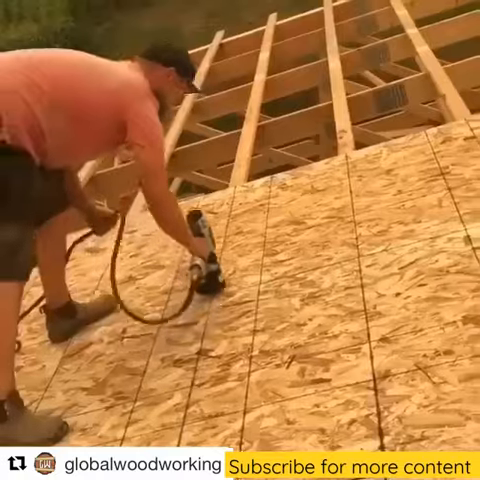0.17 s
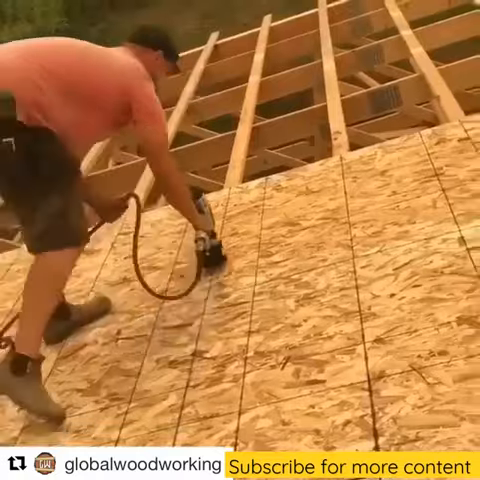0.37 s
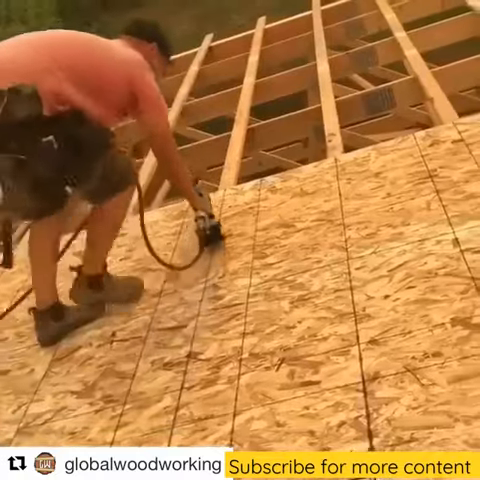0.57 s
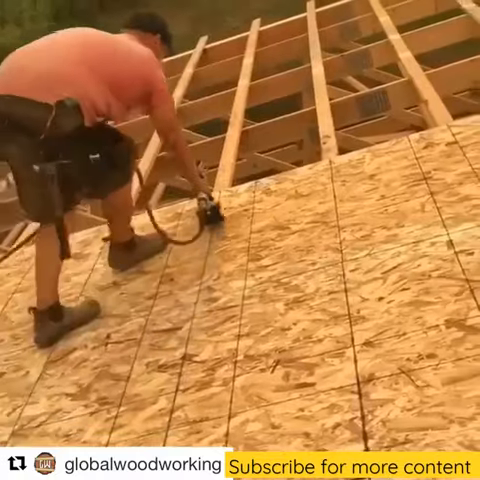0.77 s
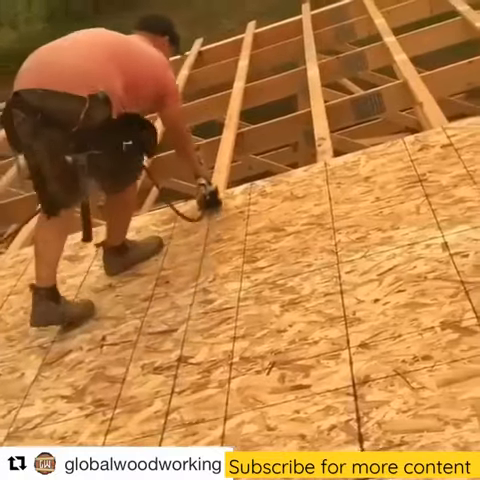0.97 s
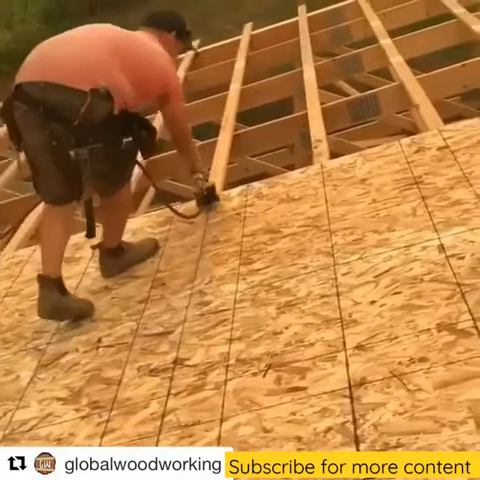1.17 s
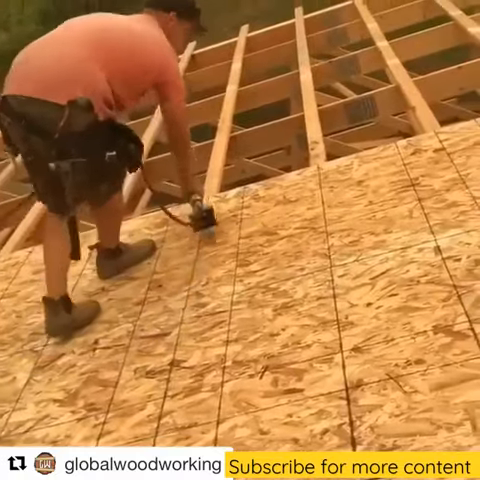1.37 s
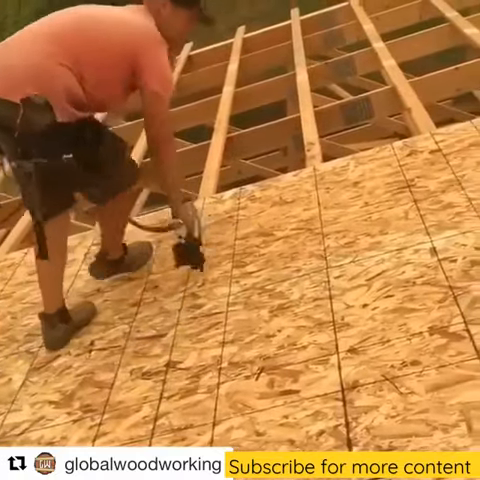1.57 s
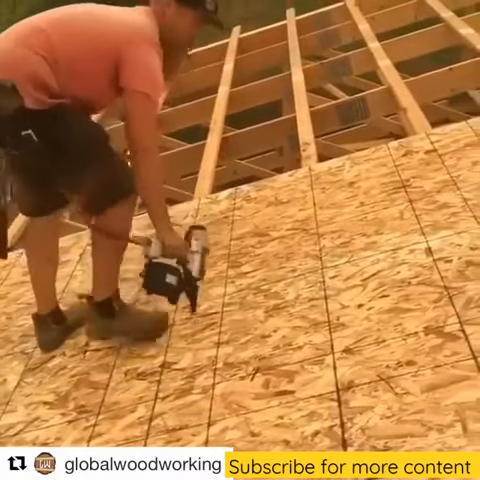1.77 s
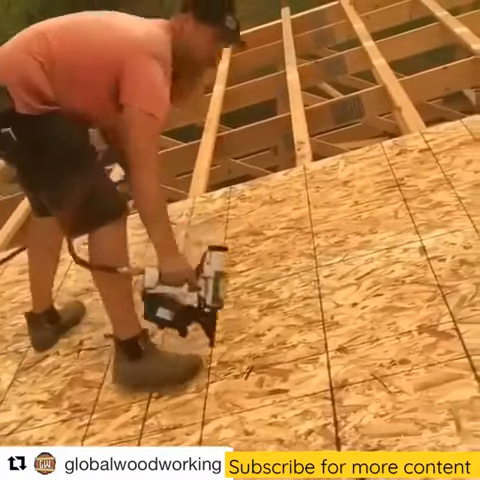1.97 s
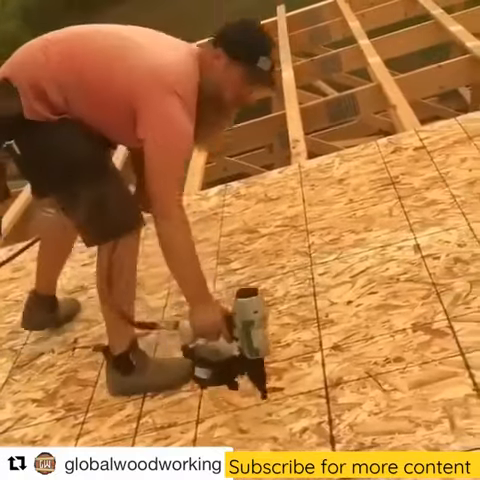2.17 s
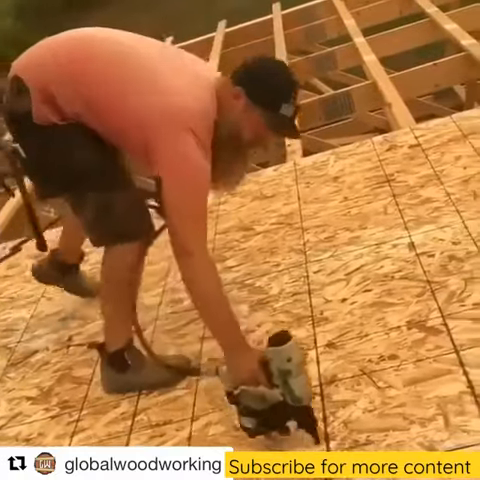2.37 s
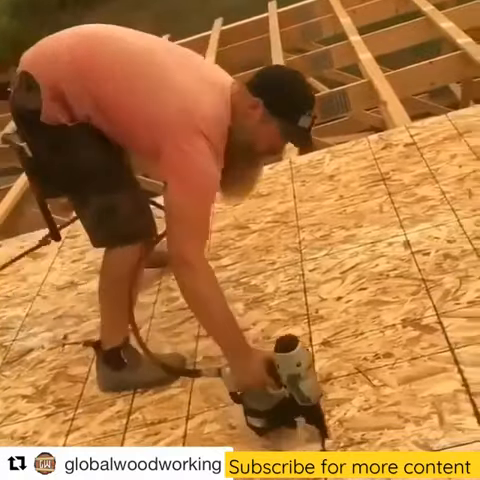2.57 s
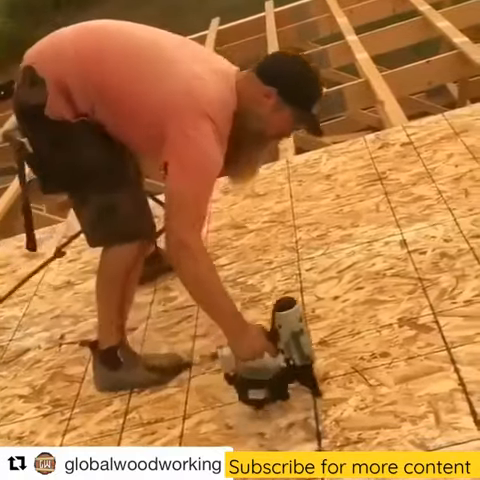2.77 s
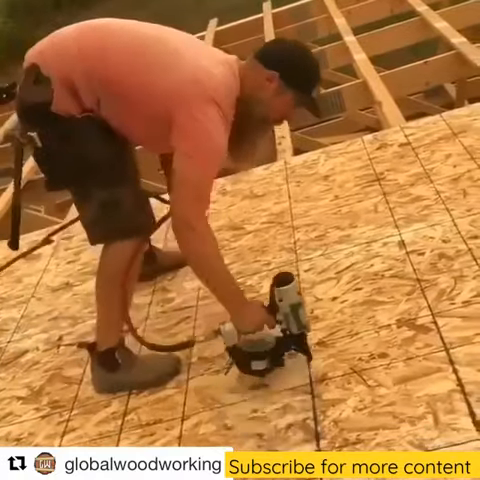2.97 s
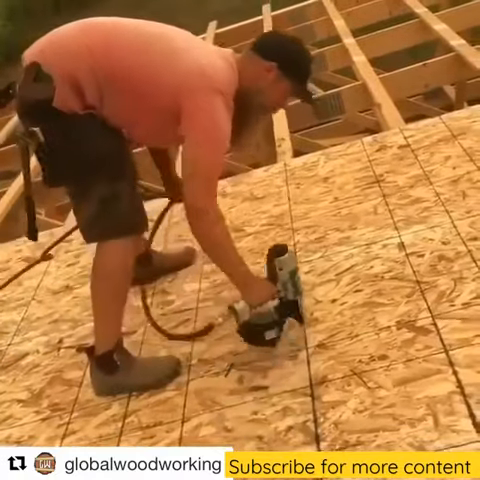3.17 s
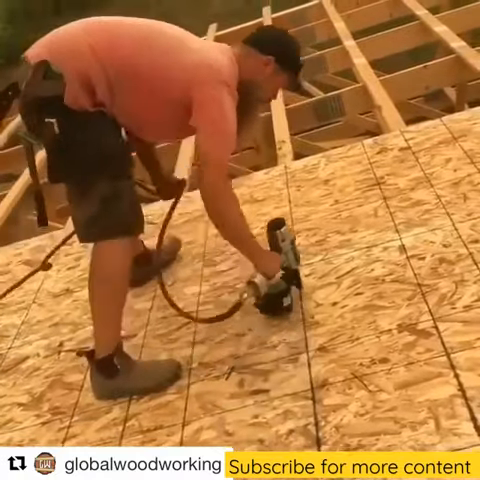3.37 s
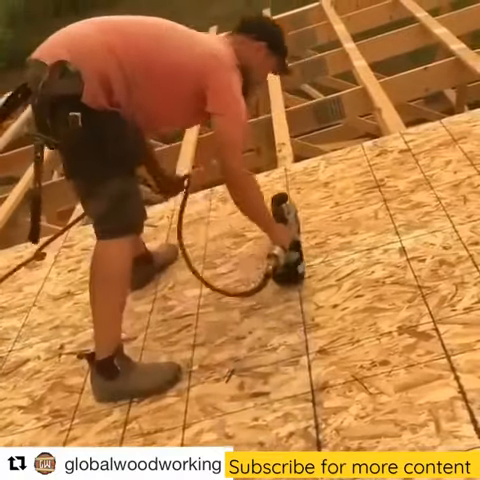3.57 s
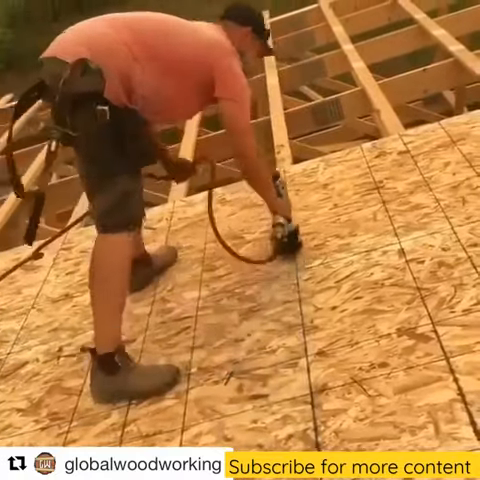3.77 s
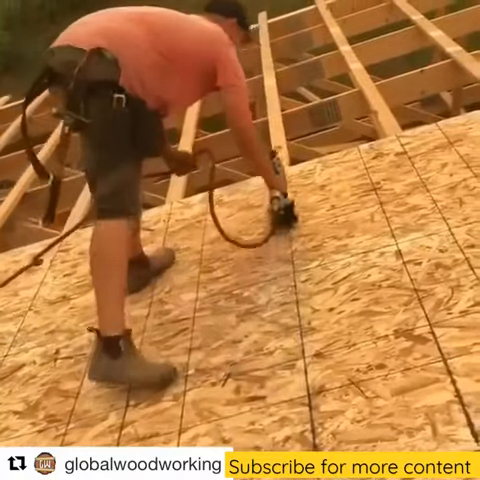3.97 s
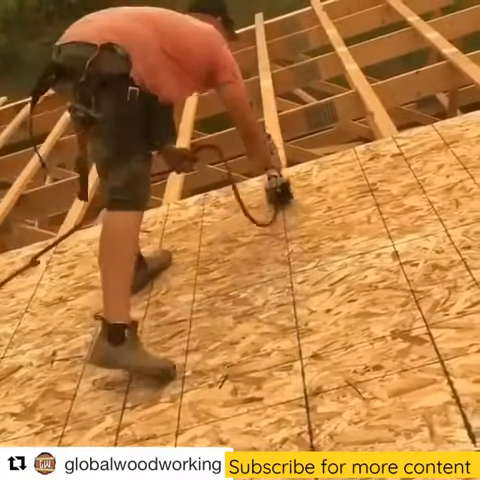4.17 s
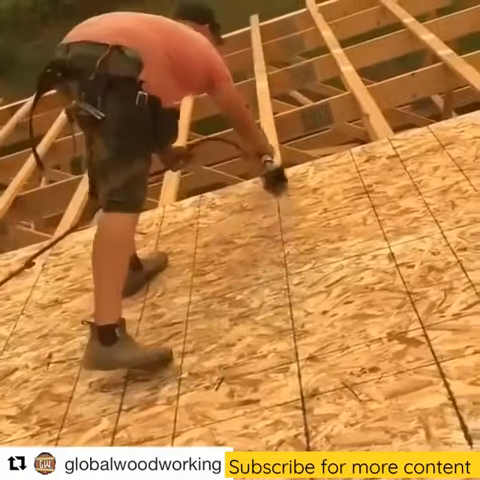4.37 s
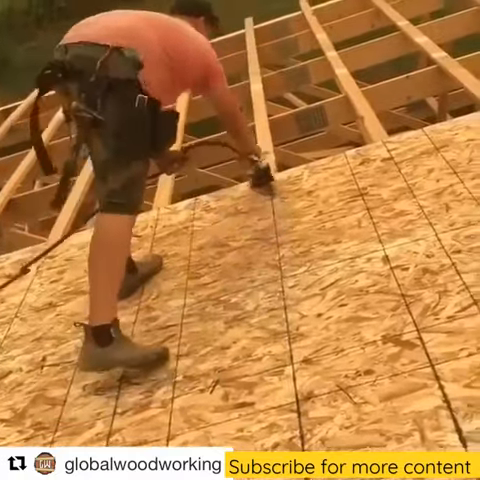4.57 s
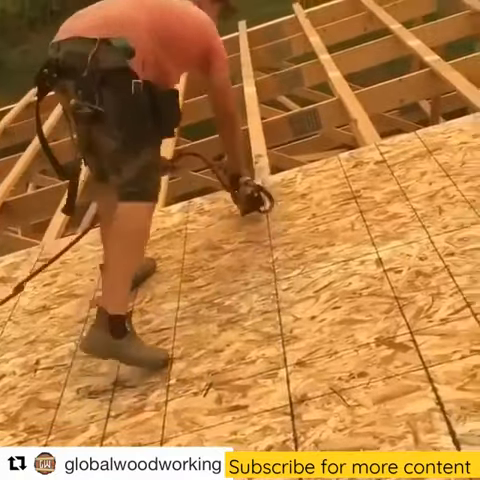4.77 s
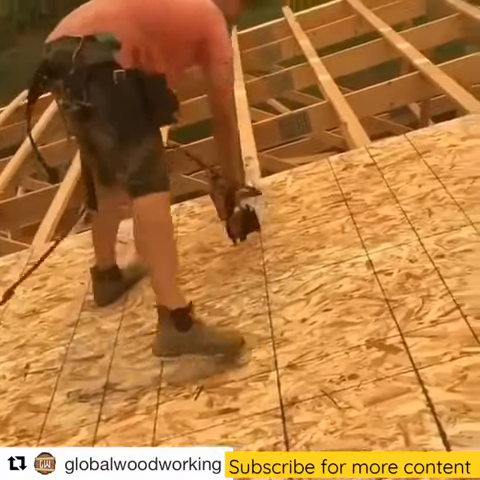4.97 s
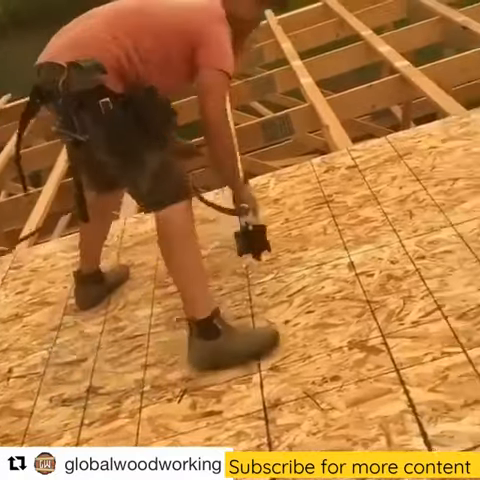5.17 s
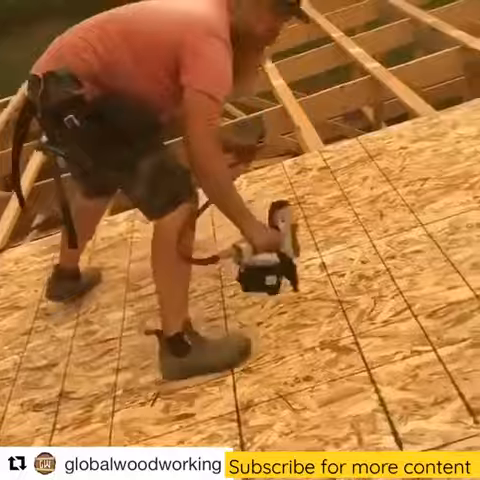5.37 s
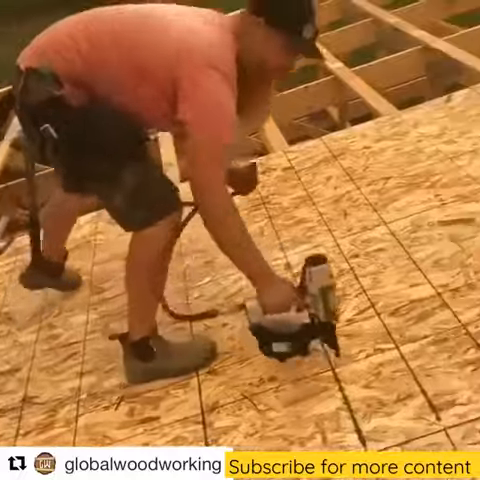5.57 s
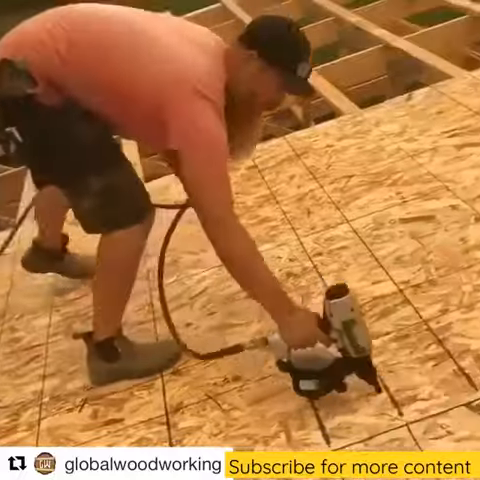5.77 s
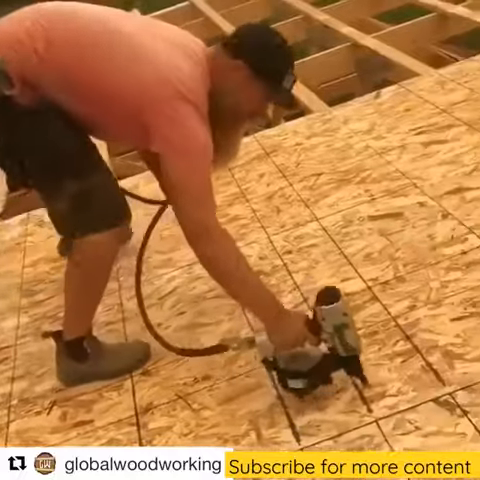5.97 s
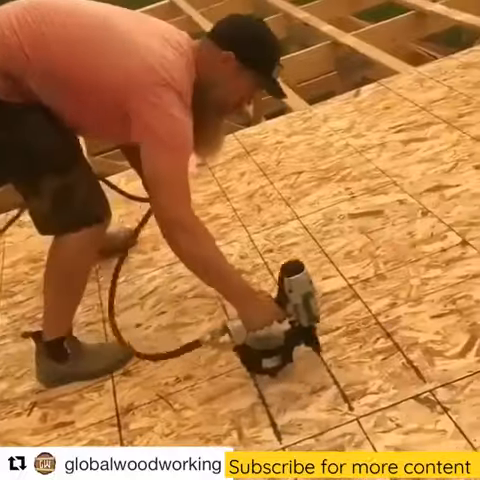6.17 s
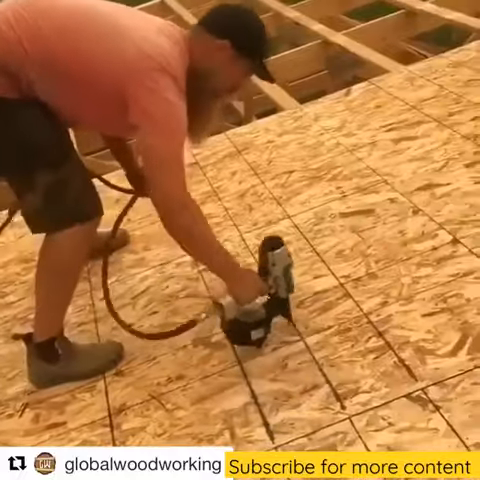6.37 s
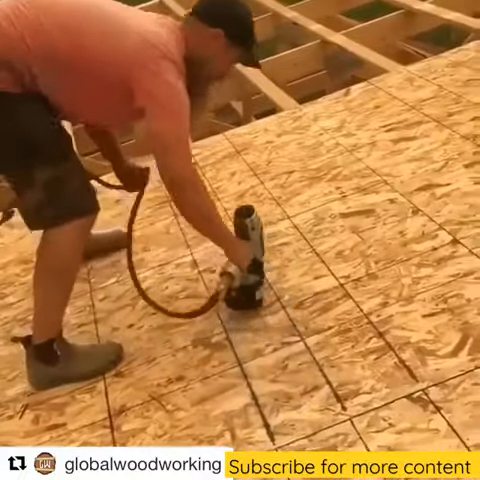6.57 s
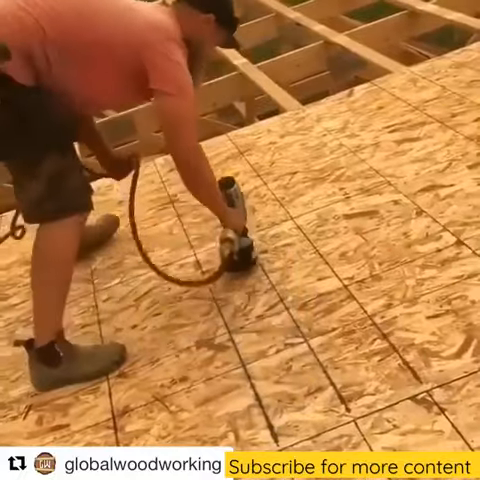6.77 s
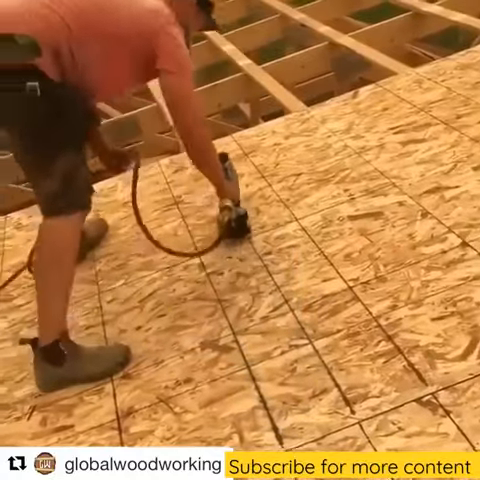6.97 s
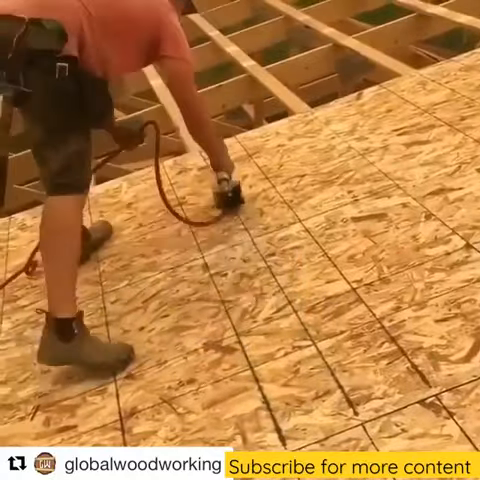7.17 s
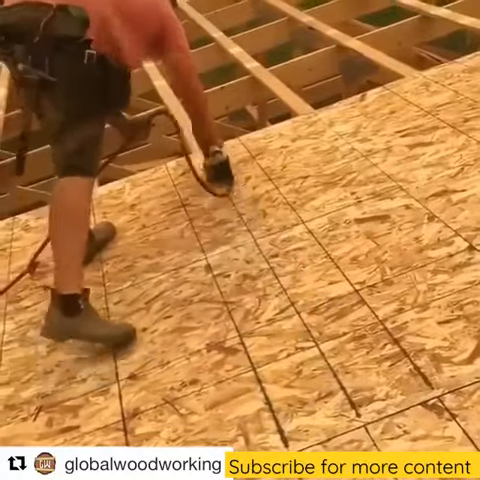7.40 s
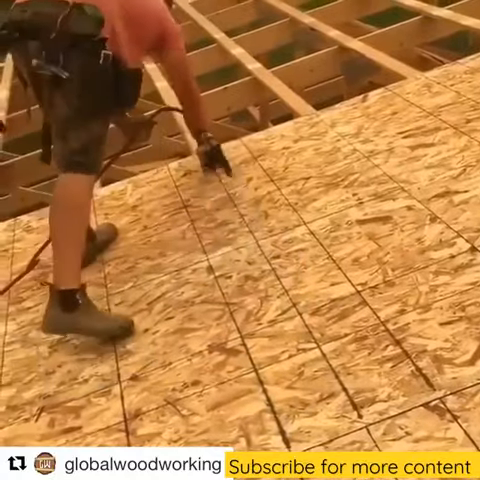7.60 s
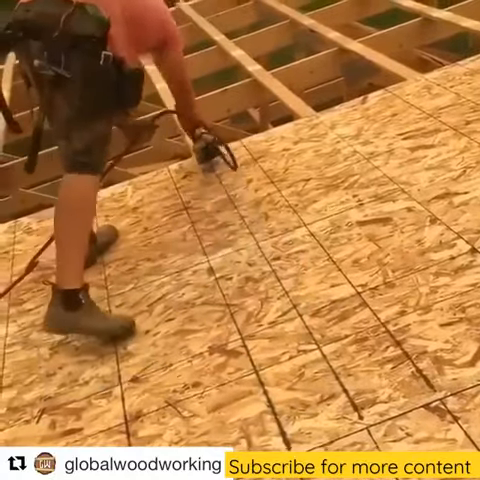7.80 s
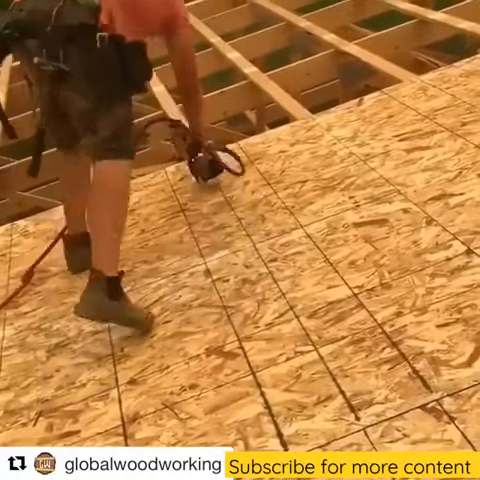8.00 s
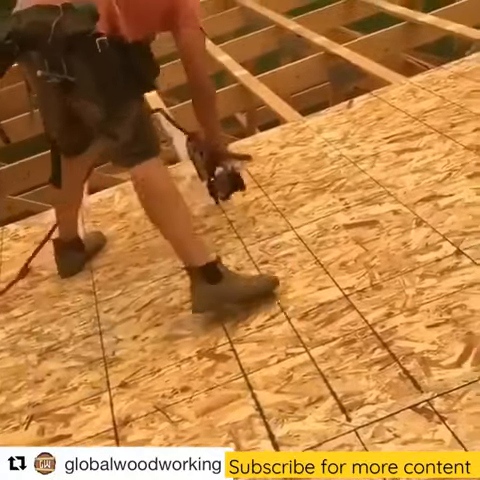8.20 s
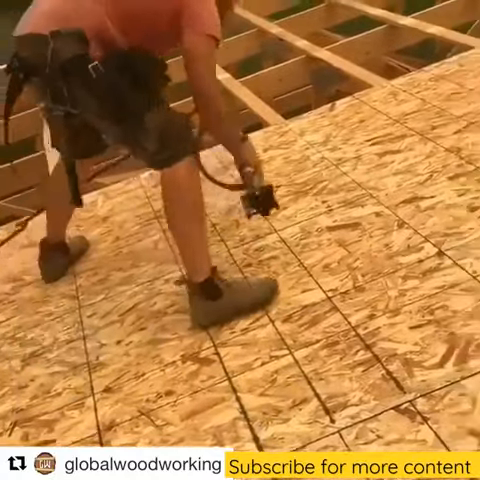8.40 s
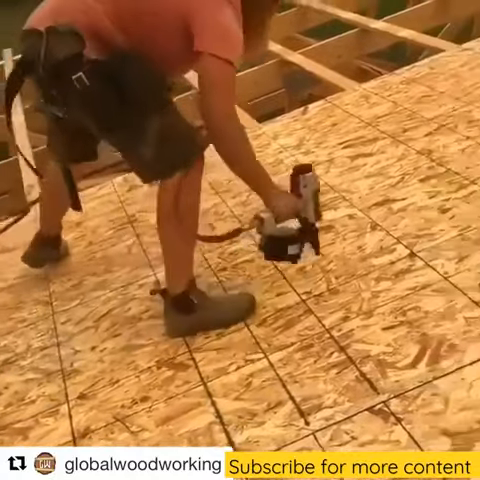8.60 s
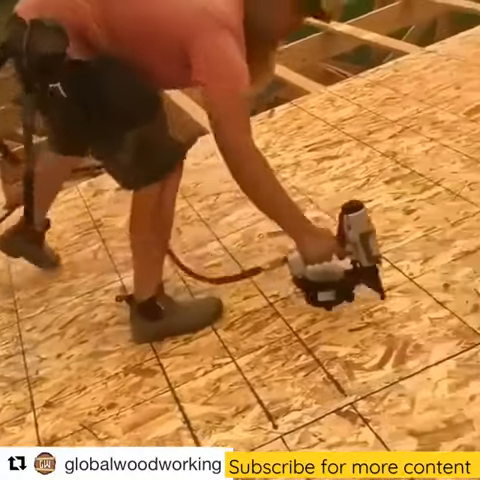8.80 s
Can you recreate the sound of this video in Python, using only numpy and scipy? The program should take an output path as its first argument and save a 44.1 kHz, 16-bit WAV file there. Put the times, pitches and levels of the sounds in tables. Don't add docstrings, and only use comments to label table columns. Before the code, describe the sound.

A pneumatic coil nailer is bumped along wooden roof sheathing outdoors, about ten nails a second. Three runs of sharp woody blows with steely cracks, low deck thumps and short air puffs are separated by quieter pauses, when boots scrape and step, the hose knocks and belt hardware ticks. The air puffs soften as the tool moves away. One nearby microphone catches light low wind and a short scatter off the rafters.

```python
import sys
import numpy as np
from scipy import signal
from scipy.fft import rfft, irfft
from scipy.io import wavfile
from scipy.ndimage import uniform_filter1d, minimum_filter1d

SR = 44100
rng = np.random.default_rng(int(sys.argv[2]) if len(sys.argv) > 2 else 0)


def volts(x):
    e = np.asarray(x, float) / 20
    return 10 ** e


def log_audio(samples):
    frames = np.atleast_2d(samples).T
    limited = np.clip(frames, -1, 1)
    pcm = np.round(limited * 32767).astype(np.int16)
    wavfile.write(sys.argv[1], SR, pcm)


N = 389844

# pitch_hz, width_hz, level_db
BOARD_MODES = [(562, 99, -1), (602, 54.4, -2), (680, 155, 7), (900, 377, 9), (1130, 202, 8.5),
               (1488, 152, 4), (1705, 302, 9.5), (2373, 280, -1)]
# pitch_hz, width_hz, level_db
STEEL_MODES = [(3366, 460, 11.5), (3890, 275, -1), (4450, 260, 5), (5350, 550, 5), (9800, 4000, -44)]
# frequency_hz, density_db per Hz
JET_SPECTRUM = [(880, -15), (1500, -1), (1800, -14), (2000, -11.5), (2690, -11), (3550, -3), (3980, -2.5),
                (4550, -5), (5670, -13.5), (7210, -19.5), (9330, -16.5), (12900, -20), (14400, -29),
                (14800, -110)]
FAR_DB = -44


def evened(x):
    return x / np.sqrt(np.mean(x ** 2) + 1e-20)


def peaked(x, db):
    return volts(db) * x / np.sqrt(uniform_filter1d(x ** 2, size=220).max())


def read(points, hz):
    f, value = np.transpose(points)
    return np.interp(np.log(hz + 1), np.log(f + 1), value)


def add(mix, s, sound):
    part = mix[max(round(s * SR), 0):][:len(sound)]
    part += sound[:len(part)]


def coloured(spectrum, count=N):
    z = rfft(rng.standard_normal(count))
    return evened(irfft(z * volts(read(spectrum, np.fft.rfftfreq(count, 1 / SR))), count))


def patchy(x, db):
    z = signal.stft(x, SR, nperseg=512)[2].T
    patches = uniform_filter1d(rng.standard_normal(z.shape), size=5, axis=0)
    patches = evened(uniform_filter1d(patches, size=5, axis=1))
    return signal.istft((z * volts(db * patches)).T, SR, nperseg=512)[1][:len(x)]


def wander(hz):
    band = signal.butter(1, [hz / 4, hz], "band", fs=SR, output="sos")
    return evened(signal.sosfilt(band, rng.standard_normal(N)))


def swell(t, start, rise, fall):
    u = np.maximum(t - start, 0)
    return (1 - np.exp(-u / rise)) * np.exp(-u / fall)


def ring(modes, detune, t, rise):
    hz, width, db = np.transpose(modes)[:, :, None]
    half_turns = np.arange(len(hz))[:, None] / 2
    turns = hz * detune[:len(hz), None] * t + half_turns
    waves = volts(db) * np.exp(-np.pi * width * t) * np.sin(2 * np.pi * turns)
    return waves.sum(0) * (1 - np.exp(-t / rise))


def nailer():
    out = np.zeros(N)
    for s, *levels in shots():
        knock, jet, lead = shot(*levels)
        add(out, s - lead, knock + jet)
        add(out, s - lead, volts(-15.5) * signal.fftconvolve(knock + 0.17 * jet, framing()))
    return out


def shots():
    # pop_s, blow_db, strongest board ring_hz, deck thump_db, steel crack_db
    run_1 = [(0.0222, -13.5, 1130, -15, -13.5), (0.1164, -14, 1014, -15, -10.5),
             (0.2108, -13.5, 1560, -14.5, -14), (0.3066, -10.5, 650, -21, -13.5),
             (0.4103, -17, 750, -33, -35), (0.5124, -17, 1260, -23.5, -14),
             (0.6211, -13.5, 1350, -18.5, -7), (0.7248, -12, 763, -14.5, -8),
             (0.8351, -14, 900, -17.5, -12.5), (0.9307, -17, 1010, -15, -15.5),
             (1.0302, -15, 1040, -19.5, -15), (1.118, -15.5, 1325, -15.5, -9),
             (1.2125, -14.5, 980, -17, -15), (1.3045, -13, 765, -25, -15), (1.403, -13.5, 775, -22, -11.5)]
    run_2 = [(2.8102, -12, 1443, -14.5, -21), (3.0151, -11.5, 1400, -11.5, -43),
             (3.084, -10.5, 980, -5, -33), (3.3641, -8.5, 1350, -11.5, -6), (3.4739, -12, 1320, -12, -10.5),
             (3.5536, -14, 735, -10.5, -24), (3.6395, -13, 1380, -12.5, -22),
             (3.7242, -18, 1470, -16.5, -23), (3.8108, -14, 990, -25, -29), (3.9066, -15, 1310, -45, -22),
             (4.0108, -17, 1290, -21.5, -11), (4.1018, -12, 630, -21.5, -10.5),
             (4.197, -10.5, 645, -16.5, -13), (4.3004, -13, 534, -15, -3.5), (4.4024, -13, 606, -14, -8.5),
             (4.5002, -12.5, 1613, -16, -8), (4.613, -12, 1280, -14.5, -7.5),
             (4.7415, -12.5, 1256, -20, -11.5), (4.8477, -13.5, 1350, -28, -7.5)]
    run_3 = [(6.2449, -10, 1455, -15.5, -11), (6.44, -11, 770, -12.5, -4), (6.5441, -11.5, 1380, -14, -22),
             (6.632, -13, 1000, -11, -6), (6.7357, -10, 1025, -12.5, -2.5), (6.8347, -13, 680, -11.5, -14),
             (6.932, -13, 680, -13, -22), (7.0263, -12.5, 696, -17, -17), (7.1162, -11.5, 680, -20, -14),
             (7.2152, -13.5, 660, -19, -15.5), (7.322, -16.5, 1510, -19.5, -12.5),
             (7.415, -11, 1320, -15.5, -6), (7.5136, -15.5, 1300, -14, -9), (7.6153, -13, 617, -12, -5),
             (7.7177, -17, 1380, -13, -10), (7.8173, -14, 1510, -15.5, -15), (7.924, -10.5, 670, -17, -10),
             (8.0203, -15.5, 645, -21, -9.5), (8.107, -16.5, 940, -25.5, -14.5)]
    # first_shot_db, far_end_db, turn_s
    facing = [(-37, -43, 0.31), (-28, -43, 0.91), (-28.5, -43.5, 0.7)]
    turn_shape = 1.84
    rows = []
    for run, (first_db, last_db, turn_s) in zip((run_1, run_2, run_3), facing):
        since = np.array(run)[:, 0] - run[0][0]
        turned = np.exp(-(since / turn_s) ** turn_shape)
        rows += [*np.c_[run, last_db + (first_db - last_db) * turned]]
    return np.array(rows)


def shot(blow_db, ring_hz, thump_db, crack_db, exhaust_db):
    # pitch_hz, width_hz, level_db
    deck = [(67, 19, -30.5), (102, 20.8, 12), (120.5, 34.6, 15), (155.2, 22.2, 13.5), (198.7, 3.7, -12),
            (239.7, 22.8, 9.5), (314, 79, 15.5)]
    t = np.arange(9000) / SR
    lead = .016
    blow = lead + .0048
    detune = rng.uniform(0.9277, 1.025, 12)
    chance, sign = rng.random(len(t)), rng.standard_normal(len(t))

    jerks = (chance < 1600 / SR) * sign * swell(t, blow, 0.00022, 0.0076)
    jerks[round((blow + .001) * SR)] += 1.2
    rattle = (chance > 1 - 1500 / SR) * sign * swell(t, blow + 0.0046, 0.0086, 0.046)
    spot = np.add(BOARD_MODES, np.outer(sign[-len(BOARD_MODES):], [0, 0, 2.5]))
    board = ring([*spot, (ring_hz, 110, 3.)], detune, t[:3000], 0.0011)
    knock = peaked(signal.fftconvolve(jerks + 0.15 * rattle, board)[:len(t)], blow_db + 1.57)

    push = t < .001 / 20
    stroke = push + 4.0 * (chance < 2500 / SR) * sign * (t < .005)
    housing = ring([(1350, 420, 14.2), (720, 170, 1), (3360, 670, 2.6)], detune, t[:500], 0.0003)
    pop = signal.fftconvolve(stroke, housing)[:800]
    add(knock, lead, peaked(pop, -20.5 + .85 * (exhaust_db + 42)))

    tip = push + .5 * (chance < 1500 / SR) * sign * np.exp(-t / 0.0057)
    crack = signal.fftconvolve(tip, ring(STEEL_MODES, detune, t[:600], 0.00024))[:1500]
    add(knock, blow + 0.001295, peaked(crack, crack_db - 8.0))
    thump = ring(deck, 1 + 2.94 * (detune[::-1] - 1), t, 0.0048)
    add(knock, blow, peaked(thump, thump_db - .7))

    shut = np.clip((blow + 0.0069 - t) / 0.0034, 0, 1)
    valve = volts(4.5 - 0.52 * (exhaust_db + 56.0)) * swell(t, 0, 0.018, 0.2) * shut
    puff = 1.044 * swell(t, lead + 0.00035, 0.0095, 0.027)
    flutter = volts(2.4 * evened(uniform_filter1d(sign, size=90)))
    jet = patchy(coloured(JET_SPECTRUM, count=len(t)), 1.15) * flutter
    muffled = signal.lfilter(*signal.butter(2, 6500, fs=SR), jet)
    air = volts(exhaust_db + 15.5) * (muffled * valve + jet * puff)
    bounce = round((.0003 + 0.0015 * chance[0]) * SR)
    ports = ring([(3554, 49, -1.4), (4620, 20, -0.65)], 1 + 0.53 * (detune - 1), t[:900], .0001)
    whistle = signal.fftconvolve(air, ports)[:len(t)]
    return knock, air + 0.5 * np.roll(air, bounce) + 0.018 * chance[1] * whistle, lead


def framing():
    # frequency_hz, t60_s
    decay = [(100, 1), (600, 0.21), (1500, 0.22), (4000, 0.37), (10000, 0.15)]
    echoes = np.zeros(SR // 2)
    at = np.arange(200, len(echoes) - 20, 20)
    echoes[at + rng.integers(0, 20, len(at))] = rng.choice([-1., 1.], len(at))
    hz, t, z = signal.stft(echoes, SR, nperseg=256)
    tail = signal.istft(z * volts(-60 * t / read(decay, hz)[:, None]), SR, nperseg=256)[1]
    return tail / np.linalg.norm(tail)


def leaks():
    # start_s, level_db, length_s
    presses = [
        (2.788, -15, 0.048),
        (2.99, -21, 0.017),
        (3.3425, -22.5, 0.027),
        (6.225, -14, 0.039),
        (6.41, -22.5, 0.023),
    ]
    out, t = np.zeros(N), np.arange(2000) / SR
    for s, db, length in presses:
        hiss = signal.lfilter(*signal.butter(1, 7000, fs=SR), coloured(JET_SPECTRUM, count=len(t)))
        cut_off = np.clip((length - t) / 0.0074, 0, 1)
        add(out, s, volts(db - 8.0) * hiss * swell(t, 0, .003, 0.046) * cut_off)
    return out


def taps(rows, t60, board_db, metal_db, grains_per_s=1800, rise=.0001, damping=8.1):
    out, t = np.zeros(N), np.arange(6000) / SR
    for s, db, hz in rows:
        detune = rng.uniform(0.844, 1.16, 12)
        chance, sign = rng.random(len(t)), rng.standard_normal(len(t))
        clicks = (chance < grains_per_s / SR) * sign * volts(-60 * t / t60)
        clicks[0] = 0.72
        modes = peaked(ring([(hz, damping / t60, 0)], np.ones(1), t, rise), 0)
        modes += peaked(ring(BOARD_MODES, detune, t, 0.00014), board_db)
        modes += peaked(ring([*STEEL_MODES, (11300, 1600, -1)], detune, t, .0001), metal_db)
        add(out, s, peaked(signal.fftconvolve(clicks, modes)[:len(t)], db))
    return out


def nudges():
    # start_s, level_db, ring_hz
    touches = [(1.624, -42, 1470), (2.96, -55, 1520), (2.981, -49, 821), (5.89, -16, 950),
               (6.207, -27.5, 890), (8.365, -35.5, 710), (8.394, -32, 700), (5.878, -29.5, 900)]
    return taps(touches, t60=0.059, board_db=-4, metal_db=-9)


def knocks():
    # start_s, level_db, ring_hz
    bumps = [(2.061, -33.5, 860), (2.3, -40, 1030), (2.603, -23, 1230), (2.769, -22.5, 730),
             (5.135, -26, 690), (5.211, -31, 740), (5.931, -14.5, 1480), (6.018, -41, 1130),
             (6.044, -35, 920)]
    return taps(bumps, t60=0.048, board_db=-6.5, metal_db=-24.5)


def clinks():
    # start_s, level_db, ring_hz
    ticks = [(1.95, -39, 1480), (2.01, -41, 1870), (5.421, -52.5, 1430), (5.466, -48, 1520),
             (5.511, -50, 1830), (5.572, -42, 1580), (5.791, -40, 1500), (8.554, -58, 2500),
             (8.672, -35, 1570), (8.744, -53, 3800)]
    return taps(ticks, t60=0.032, board_db=-13, metal_db=-1.5)


def footsteps():
    # start_s, level_db, ring_hz
    landings = [(2.063, -32, 259), (2.61, -30, 300), (2.768, -30, 115), (3.179, -27, 86),
                (5.424, -20.5, 78), (5.462, -25, 71), (5.508, -28, 65), (5.884, -29, 71.5),
                (5.927, -25, 113), (5.94, -25.5, 298), (8.644, -25, 76.4)]
    return taps(landings, 0.19, board_db=-23, metal_db=-41, grains_per_s=91, rise=0.0025, damping=7.2)


def scrapes():
    # frequency_hz, density_db per Hz
    rubbing = [(180, -42), (300, -3), (325, -7), (359, -9), (656, 3), (798, -5.5), (1460, -4),
               (2270, -23.5), (2580, -25), (4640, -23), (6120, -51), (13000, -46), (14800, -78)]
    body, treble = pressure()
    grit = volts(2. * wander(60) + 1.8 * wander(500))
    drag = patchy(coloured(rubbing), 3.) * grit
    low = signal.sosfilt(signal.butter(4, 2300, fs=SR, output="sos"), drag)
    high = signal.sosfilt(signal.butter(4, 2300, "high", fs=SR, output="sos"), drag)
    return volts(-2.0) * body * evened(low) + volts(3.0) * treble * evened(high)


def pressure():
    # start_s, rise_s, hold_s, level_db, treble_over_body_db
    drags = [(1.59, 0.046, .12, -33.5, -23), (1.729, 0.031, 0.039, -37.5, -8.5),
             (2.044, 0.023, 0.16, -44.5, -15), (2.197, 0.046, 0.34, -54.5, -12),
             (2.59, 0.046, 0.27, -46, -30), (4.995, 0.097, 0.14, -33.5, -21.5),
             (5.4, 0.044, 0.16, -63.5, -5.5), (5.574, .12, 0.25, -46.5, -15.5),
             (5.87, 0.038, 0.05, -31, -29), (5.962, .03, 0.05, -36.5, -30),
             (8.264, 0.039, 0.039, -38.5, -21), (8.354, 0.031, 0.016, -36, -17.5),
             (8.54, 0.066, .3, -56.5, -7.5)]
    stop_db_per_s = 422
    rest_s = .15
    lift_after_s, lift_rise_s = 0.085, 0.042
    # (dB at the far end, share of facing, fade dB per s)
    lift_bands = ((-46.5, 0.25, 27), (-69.5, 0.62, 50))
    t, nails = np.arange(0, N / SR, .001), shots()
    body, treble = volts(-61) ** 2, volts(-75) ** 2
    for start, rise, hold, db, treble_db in drags:
        power = contact(t, start, rise, hold, db, stop_db_per_s) ** 2
        body, treble = body + power, treble + power * volts(treble_db) ** 2
    before_rest = np.diff(nails[:, 0], append=N) > rest_s
    for s, *_, exhaust_db in nails[before_rest]:
        lift = []
        for db, share, fade in lift_bands:
            level_db = db + share * (exhaust_db - FAR_DB)
            lift.append(contact(t, s + lift_after_s, lift_rise_s, 0, level_db, fade) ** 2)
        body, treble = body + lift[0], treble + lift[1]
    return [np.interp(np.arange(N) / SR, t, np.sqrt(power)) for power in (body, treble)]


def contact(t, start, rise, hold, db, fade_db_per_s):
    opening = np.clip((t - start) / rise, 0, 1)
    faded_db = fade_db_per_s * np.maximum(t - start - rise - hold, 0)
    return volts(db - 10.5 * (1 - opening) - faded_db) * (t > start)


def wind():
    # frequency_hz, density_db per Hz
    buffeting = [(12, -49), (20, -6), (64, -0.5), (160, -9), (192, -10.5), (278, -9.5), (325, -15),
                 (365, -10), (600, -62), (780, -63), (1320, -120)]
    # time_s, level_db
    breeze = [(0, -33), (1.6, -35.5), (2.1, -44.5), (2.75, -39), (5.05, -35), (5.5, -42.5), (6.3, -34.5),
              (8.4, -37.5), (8.84, -39.5)]
    t = np.arange(N) / SR
    power = volts(np.interp(t, *np.transpose(breeze))) ** 2
    shake = swell(t[:SR // 2], 0, 0.016, 0.042)
    for s, _, _, thump_db, _, exhaust_db in shots():
        rumble_db = -23.5 + 0.69 * (exhaust_db - FAR_DB) + 0.07 * (thump_db + 19.5)
        add(power, s, (volts(rumble_db) * shake) ** 2)
    lumps = evened(coloured(buffeting) * volts(1.9 * wander(18.4)))
    return lumps * np.sqrt(power)


def distant_hush():
    # frequency_hz, density_db per Hz
    far_air = [(260, -30), (450, -10), (843, -11), (1350, 1), (2090, -7), (3230, -18), (5010, -23),
               (13500, -20.5), (14800, -43)]
    return volts(-60.5 - 3.) * patchy(coloured(far_air), 2.)


def scene():
    tool = nailer() + leaks()
    small = nudges() + knocks() + clinks() + footsteps()
    return (tool + small + scrapes() + wind() + distant_hush())[None]


def suppressed(x):
    from_hz, below_db, share = 5800, -69.0, 0.35
    hz, _, z = signal.stft(x, SR, nperseg=1024)
    band = np.arange(len(hz)) // 7
    draws = rng.random((z.shape[1] // 3 + 1, band[-1] + 1))
    picked = draws.repeat(3, axis=0)[:z.shape[1]].T[band] < share
    weak = uniform_filter1d(abs(z) ** 2, size=7, axis=0) < volts(below_db) ** 2
    gain = np.where(picked & weak & (hz[:, None] > from_hz), .08, 1)
    return signal.istft(z * gain, SR, nperseg=1024)[1][:N]


def roll_off(x):
    return signal.sosfilt(signal.butter(12, 14920, fs=SR, output="sos"), x)


def record(dry):
    x = signal.sosfilt(signal.butter(3, 48, "high", fs=SR, output="sos"), dry[0])
    ceiling = .69
    room = minimum_filter1d(ceiling / np.maximum(abs(x), ceiling), size=161)
    x = suppressed(x * uniform_filter1d(room, size=81))
    x = signal.oaconvolve(x, signal.firwin(255, 14200, window=("kaiser", 9), fs=SR), "same")
    return roll_off(x[None])


dry = scene()
out = record(dry)
log_audio(out)
```